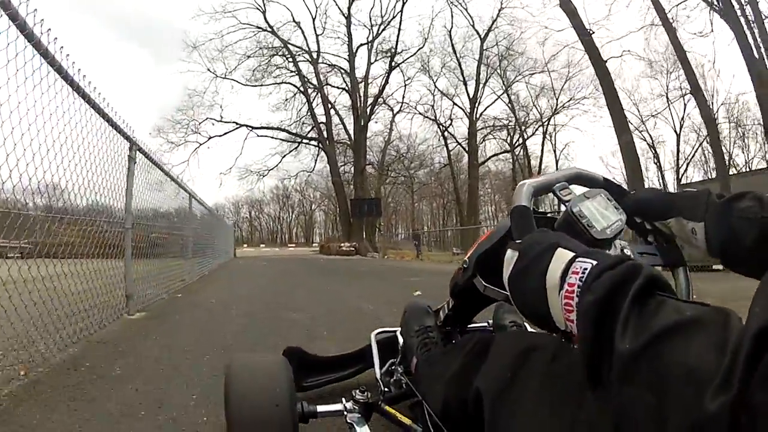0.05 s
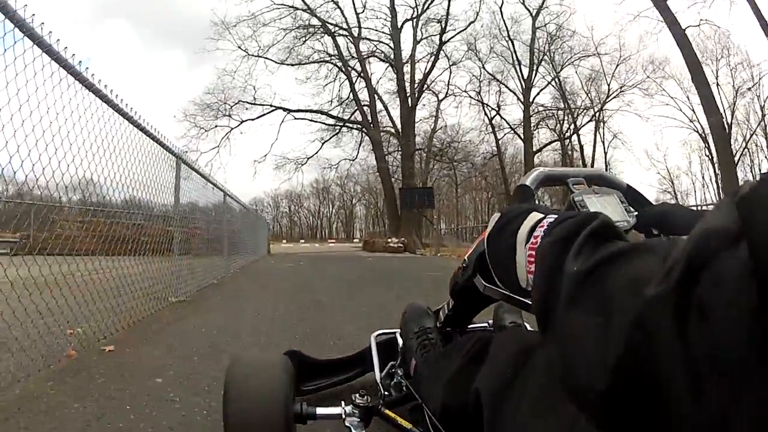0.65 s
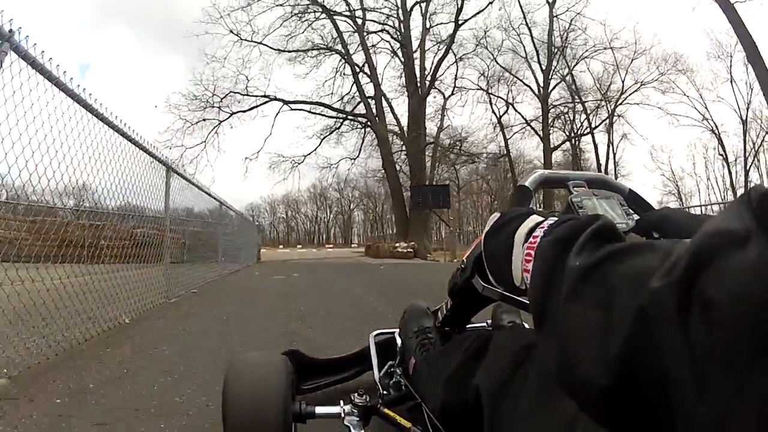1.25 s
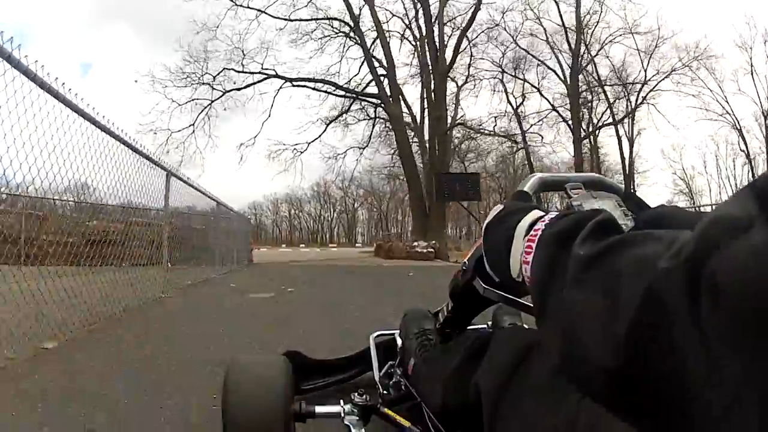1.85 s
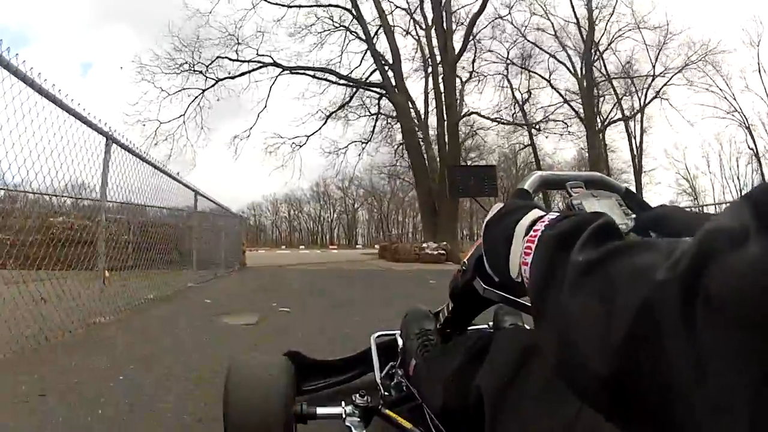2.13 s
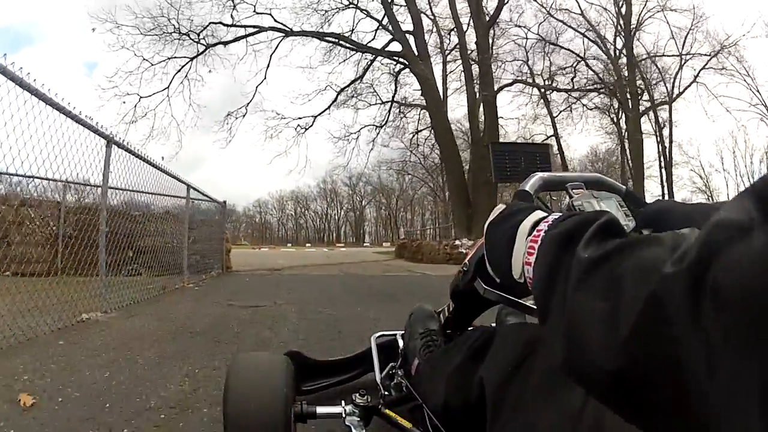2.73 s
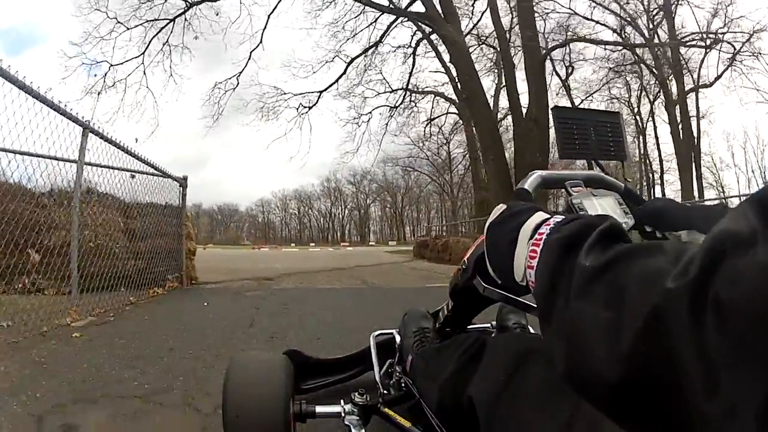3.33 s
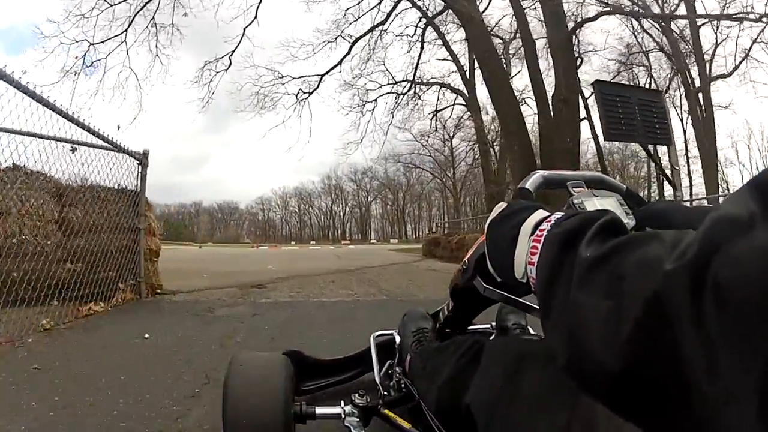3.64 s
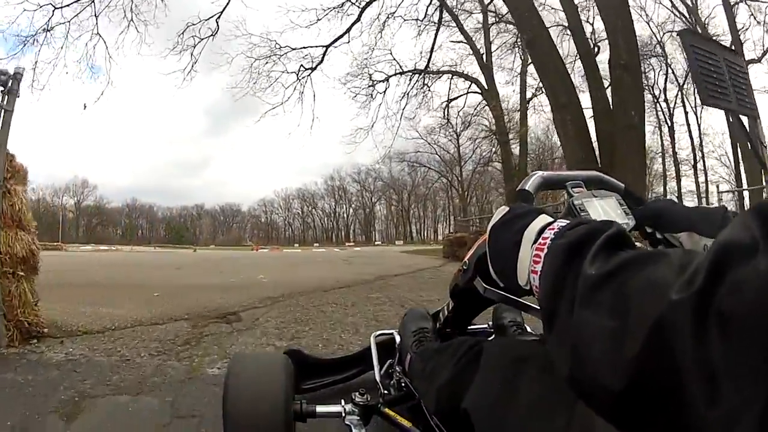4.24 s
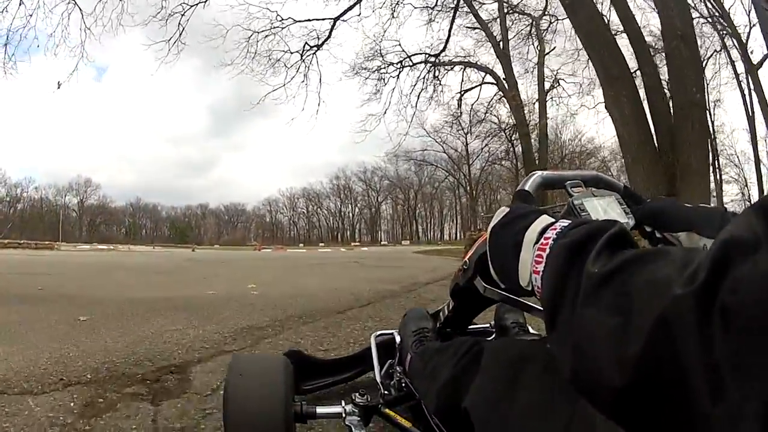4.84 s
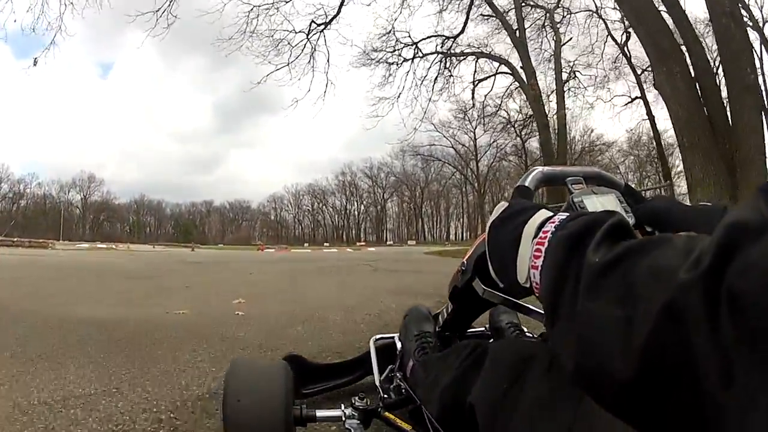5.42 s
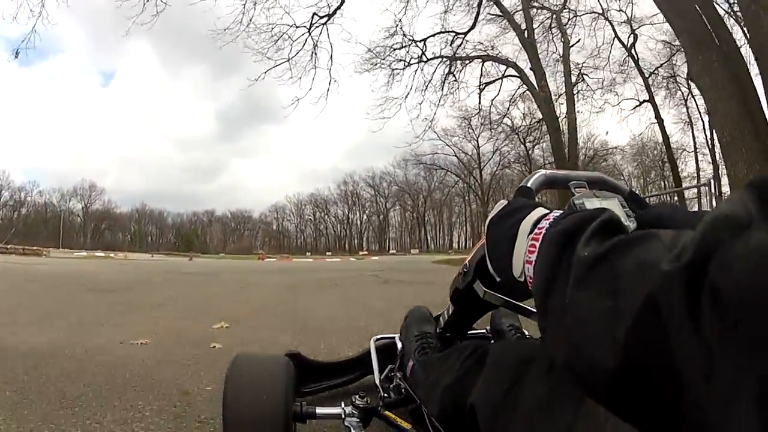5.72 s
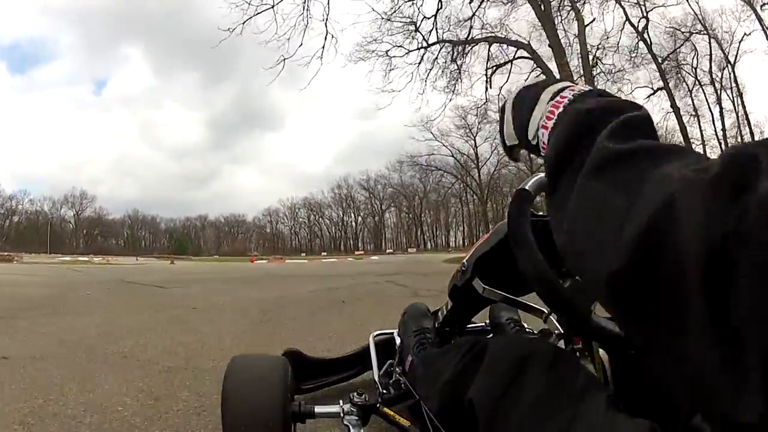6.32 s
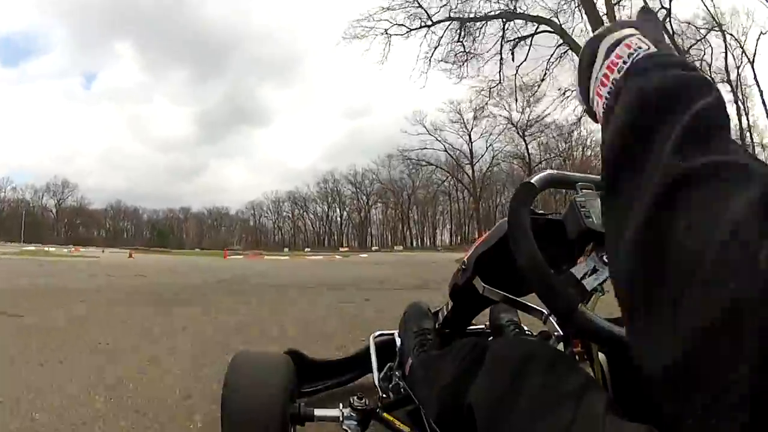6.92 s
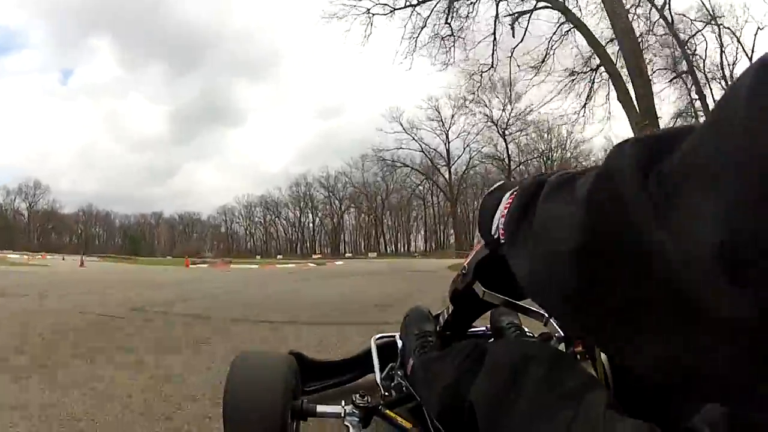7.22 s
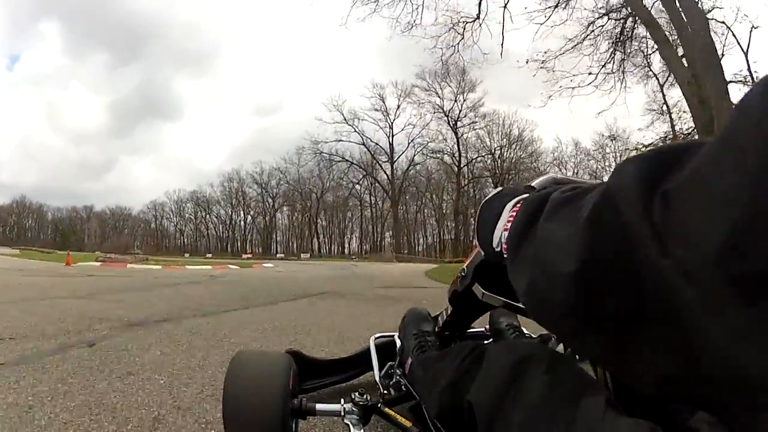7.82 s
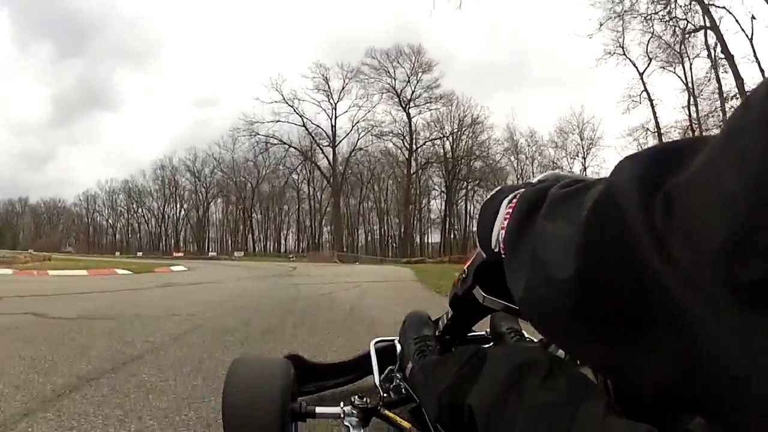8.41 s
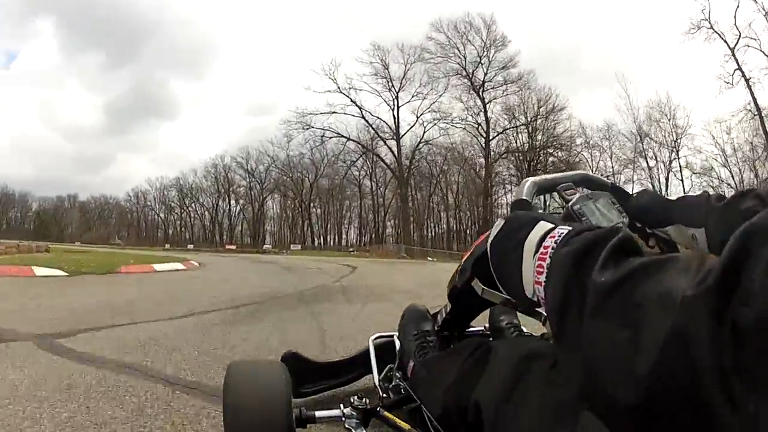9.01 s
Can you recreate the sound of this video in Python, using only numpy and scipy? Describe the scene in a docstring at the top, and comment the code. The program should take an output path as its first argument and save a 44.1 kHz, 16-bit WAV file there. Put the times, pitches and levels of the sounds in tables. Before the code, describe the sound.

Heard up close from the frame of a go-kart rolling onto an outdoor track, a two-stroke engine sputters and pops. As it slows, loud scattered exhaust cracks break through surges of tyre rumble and rattling from the rough surface. A little past halfway the engine catches and climbs steadily in pitch, firing ever more rapidly, while the housing around the microphone buzzes and knocks.

```python
"""Uneven pops of an idling two-stroke kart engine, about one every third turn, heard from its frame.
The kart rolls out, coasts with hard bangs over broken asphalt, then picks up and fires ever more often.
Each firing is an impulse that excites the resonances of pipe, engine metal and frame and leaves a puff
of turbulent gas. The piston sways the frame, the tyres rumble, and the housing around the microphone
rattles and knocks. A limiter ducks the level after every hard bang."""
import sys
import numpy as np
from scipy import signal
from scipy.fft import rfft, irfft
from scipy.io import wavfile
from scipy.ndimage import uniform_filter1d

SR = 44100
rng = np.random.default_rng(int(sys.argv[2]) if len(sys.argv) > 2 else 0)


def store_pcm(level_fs):
    """Save levels as 16-bit WAV."""
    pcm = np.round(np.clip(level_fs, -1, 1) * 32767).astype(np.int16)
    wavfile.write(sys.argv[1], SR, np.atleast_2d(pcm).T)


N = 403956
TIME = np.arange(N) / SR
RING_TIME = np.arange(8192) / SR  # time axis of the impulse responses

# Levels in all tables are relative.
# Rotation rate of the crank: t/s, f/Hz
CRANK_SPEED = [(0, 47.96), (1.95, 47.96), (2.2, 45), (2.9, 33.69), (4.3, 32), (4.48, 48), (4.8, 32),
               (5.2, 33), (5.2375, 44.7), (5.32, 54.42), (5.47, 59.59), (6.1, 60.53), (7.05, 63.23),
               (7.35, 68.36), (8.0, 81.5), (9.16, 105.65)]
# Turns needed to gather a charge that burns: start t/s, interval/turns (0 = coasting)
FIRING_RHYTHM = [(.015, 3), (.14, 4), (.31, 2), (.44, 3), (.68, 5), (.79, 3.5), (1.08, 3), (1.39, 4),
                 (1.64, 3), (2.0, 4), (2.22, 0), (5.23, 2), (7.18, 1.72), (7.36, 1.125), (7.49, 1.065),
                 (7.76, 1.095), (7.91, 1.3), (7.96, 1.5), (8.13, 1.5), (8.56, 1.53)]
# Stray bangs while coasting: t/s, level/dB
STRAY_BANGS = [(2.2453, -1.5), (2.61, -1), (2.7239, 14), (2.9184, 11.5), (3.0373, 10.5), (3.0791, 11),
               (3.115, 10), (3.3772, -6.5), (3.4931, 4), (3.5843, 5.5), (3.711, 10.5), (3.8688, -3),
               (3.8975, 10.5), (3.9898, -6.5), (4.0982, 7.5), (4.2655, -4), (4.3307, 10.5), (4.4151, 10.5),
               (4.4568, 11.5), (4.5163, 10.5), (4.7456, 1.5), (4.809, -2), (4.8407, 5), (4.9346, 9),
               (5.0887, 11)]
# Exhaust pipe resonances: f/Hz at idle, f/Hz at speed, bandwidth/Hz, level/dB
PIPE_RESONANCES = [(679, 630, 210, 4.5), (1077, 1030, 230, -14), (1800, 1805, 134, -0.5),
                   (2296, 2445, 84, 4.5), (2582, 2700, 143, -0.5), (3426, 3590, 226, 7),
                   (3540, 3720, 90, 4.5), (4492, 4740, 111, 5), (4937, 5050, 237, -2.5),
                   (5175, 8300, 144, -8), (6650, 6550, 65, -7), (7070, 7070, 340, -6.5),
                   (7485, 7280, 104, 0.5), (8595, 8300, 157, 1), (10070, 18000, 270, -10),
                   (9060, 6900, 170, -55), (14340, 42000, 280, -7.5)]
# Spectrum of the turbulent gas: f/Hz, level/dB
GAS_SPECTRUM = [(500, -35), (1100, -0.5), (1550, -4), (1850, 6.5), (2700, 1), (3500, 7), (4100, -13),
                (4800, 5), (6000, -14.5), (7200, -7.5), (8700, 0), (10800, -9.5), (13300, -4.5),
                (15000, -46)]
# Modes of the engine's metal: f/Hz, level/dB, T60/s
METAL_MODES = [(1850, -17, .1), (2963, 3, .12), (4690, -15, .13), (5087, -24, .2), (6925, -21, .2),
               (7321, -19, .16), (9035, -7, .11), (14968, -9, .11)]
# Low modes of frame and air box: f/Hz, level/dB, T60/s
FRAME_MODES = [(83, -7.5, 0.33), (145.3, -9.5, 0.097), (220, -1, 0.2), (275.2, -0.5, 0.18),
               (395, -9, 0.057), (433, -20, 0.053), (570, -1.5, 0.11), (745, -20.5, 0.14)]
# Sway of the frame against crank rate: f/Hz, level/dB
FRAME_SWAY = [(32, -22.5), (48, -28), (55, -17), (60, -26), (68, -27.5), (76, -22.5), (88, -23.5),
              (98, -30.5)]
# Cavity resonances of the air box: f/Hz, bandwidth/Hz, level/dB
AIRBOX_RESONANCES = [(98, 30, -5), (165, 80, 3), (425, 60, -5)]
# Spectrum of the tyre rumble: f/Hz, level/dB
TYRE_SPECTRUM = [(20, -36), (50, -7), (90, -4.5), (170, -5.5), (250, -6), (400, -11.5), (750, -44),
                 (1000, -24.5), (3000, -60), (6000, -52), (9000, -40.5)]
# Stretches of broken asphalt: start t/s, end t/s, rumble level/dB, rattle level/dB
BROKEN_ASPHALT = [(2.23, 2.556, -14.5, -14), (2.562, 3.094, -8, -9), (3.273, 3.682, -10, -11),
                  (3.72, 3.864, -10.5, -12), (4.007, 4.46, -12, -21.5), (4.576, 4.93, -9.5, -18),
                  (4.924, 5.2, -11.5, -17)]
# Hard knocks of the housing: t/s, level/dB
HARD_KNOCKS = [(1.496, 1.5), (1.581, 0), (2.71, 2), (3.01, 0), (3.115, 14), (3.44, -2), (5.439, 1),
               (5.539, 4), (6.053, 3.5), (6.818, -1), (6.937, 2), (7.125, -0.5), (7.273, 6.5), (7.341, 6.5),
               (7.87, 4.5), (8.028, 3), (8.208, 4), (8.627, 0)]
# Spectrum of the housing's rattle: f/Hz, level/dB
RATTLE_SPECTRUM = [(40, -12), (150, -5), (350, -2), (500, 0), (670, 5), (770, 0.5), (860, -10), (980, -18),
                   (1250, -19.5), (1550, -21), (3000, -20.5), (6000, -39)]
# High resonances of the housing: f/Hz, bandwidth/Hz, level/dB
SIZZLE_RESONANCES = [(11330, 230, 0), (12670, 230, 0), (14950, 300, -5)]
# Response of the microphone in its housing: f/Hz, level/dB
MICROPHONE_RESPONSE = [(0, -0.5), (9500, 0), (10700, -7.5), (13400, -7.5), (14500, -3), (16000, -14)]

THROTTLE_S = 5.2375  # the throttle opens
IDLE_DB, OPEN_DB, AT_SPEED_DB = 2.5, -1.5, -4.5  # firing level: idle, open throttle, change at speed
FLOODED_DB, CLEARING_S = 9, 0.29  # fuel gathered while coasting makes the first firings harder
AFTER_MISS_DB, STEADY_DB = 1.6, 3  # firings are stronger after a missed turn and in an unbroken run


def crank():
    """Angle is the integral of rotation rate: returns it in turns, and the time of each whole turn."""
    turns = np.cumsum(curve(CRANK_SPEED, TIME)) / SR
    turns -= np.interp(THROTTLE_S, TIME, turns)
    return turns, np.interp(np.arange(np.ceil(turns[0]), turns[-1]), turns, TIME)


def firings(turn_s, uneven_db=1.0, jitter_s=.0003):
    """Combustion is a pulse train locked to the crank: returns times and sizes, stray bangs included."""
    ends = [start for start, _ in FIRING_RHYTHM[1:]] + [TIME[-1]]
    fired = []
    for (start, every), end in zip(FIRING_RHYTHM, ends):
        if every:
            first, last = np.searchsorted(turn_s, [start, end])
            fired.extend(first + np.arange(0, last - first, every).astype(int))
    t = turn_s[fired]
    after_miss = np.diff(fired, prepend=0) > 1
    flooded = np.exp(-abs(t - THROTTLE_S) / CLEARING_S)
    open_db = OPEN_DB + AT_SPEED_DB * workload(t) + FLOODED_DB * flooded
    open_db += AFTER_MISS_DB * after_miss + STEADY_DB * steadiness(t)
    bang_s, bang_db = np.transpose(STRAY_BANGS)
    strength, lateness = rng.standard_normal((len(t), 2)).T
    db = np.where(t < bang_s[0], IDLE_DB, open_db) + uneven_db * (1 - steadiness(t)) * strength
    jittered_s = t + jitter_s * (1 - workload(t)) * lateness
    return np.r_[jittered_s, bang_s], gain_of(np.r_[db, bang_db])


def half_burns(turn_s, share=.08, half_db=-12):
    """Partial combustion on a few idling turns gives faint ticks among the pops."""
    t = turn_s[(rng.random(len(turn_s)) < share) & (turn_s < STRAY_BANGS[0][0])]
    return t, np.full(len(t), gain_of(half_db))


def exhaust(t, size, crack_db=-1.0, drift=0.0077, softening_db=-2.0, unsteady=.08):
    """Impulse excitation: each firing rings the pipe, whose resonances shift and soften with load."""
    loads = np.linspace(0, 1, 9)
    firing_load = workload(t) + unsteady * (1 - steadiness(t)) * rng.standard_normal(len(t))
    nearest = abs(firing_load[:, None] - loads).argmin(1)
    cracks = []
    for load in loads:
        pipe = [((idle + load * (fast - idle)) * (1 + drift * rng.standard_normal()), width, db)
                for idle, fast, width, db in PIPE_RESONANCES]
        cracks.append(resonances(pipe))
    mean_peak = np.abs(cracks).max(1).mean()
    cracks = np.array(cracks) / mean_peak * gain_of(crack_db + softening_db * loads)[:, None]
    return sum(ring(impulses(t, size * (nearest == k)), crack) for k, crack in enumerate(cracks))


def gas(t, size, echo_db=-23, echo_t60=.06, puff_db=-21, puff_t60=0.094, tail_db=-35, tail_t60=0.2,
        hiss_db=-40, rasp_db=3, calm_db=-9):
    """Scattering off the kart gives every firing the same echo; turbulence adds a fresh puff over hiss."""
    fired = impulses(t, size * gain_of(rasp_db * workload(t) ** 2))
    scatter = colour(rng.standard_normal(N), GAS_SPECTRUM)[:len(RING_TIME)] * decay(echo_db, echo_t60)
    puff_power = decay(puff_db, puff_t60) ** 2 + decay(tail_db, tail_t60) ** 2
    puffs = fired * gain_of(calm_db * steadiness(TIME))
    power = abs(ring(puffs ** 2, puff_power)) + gain_of(hiss_db) ** 2  # incoherent sounds add in power
    return ring(fired, scatter) + np.sqrt(power) * colour(rng.standard_normal(N), GAS_SPECTRUM)


def engine_body(t, size, metal_db=-21, thump_db=-21, hardest_db=3, metal_fade_db=-6, thump_fade_db=-4):
    """Free vibration: firings strike the modes of engine metal and frame, more gently at speed."""
    fade = workload(t) ** 2
    strikes = impulses(t, size * gain_of(metal_db + metal_fade_db * fade))
    thumps = impulses(t, np.minimum(size, gain_of(hardest_db)) * gain_of(thump_db + thump_fade_db * fade))
    return ring(strikes, modes(METAL_MODES)) + ring(thumps, modes(FRAME_MODES))


def frame_sway(turns):
    """Forced vibration: the piston sways the frame once a turn, fired or not."""
    sway_db = curve(FRAME_SWAY, curve(CRANK_SPEED, TIME))
    return np.sqrt(2) * np.sin(2 * np.pi * turns) * gain_of(sway_db)


def air_box(turn_s, pump_db=-1):
    """Cavity resonance: the piston pumps a hollow note from the air box on every turn."""
    gulps = impulses(turn_s, 1 + .2 * rng.standard_normal(len(turn_s)))
    return gain_of(pump_db) * unit_rms(ring(gulps, resonances(AIRBOX_RESONANCES)))


def tyres(turns, road_db=-4, throb=0.29):
    """Rolling noise: a low rumble, amplitude-modulated at the crank rate."""
    noise = rng.standard_normal(N) * (1 + throb * np.sin(2 * np.pi * turns))
    return gain_of(road_db) * colour(noise, TYRE_SPECTRUM)


def shaking(pit_lane_db=-23.5, track_db=-37, engine_db=-17, at_speed_db=2.5, attack_s=0.14, release_s=0.19):
    """Powers add: gains of rumble and rattle, each a base that swells on broken asphalt."""
    rumble_power = gain_of(np.where(TIME < THROTTLE_S, pit_lane_db, track_db)) ** 2
    rattle_power = gain_of(engine_db + at_speed_db * workload(TIME)) ** 2
    for start, end, rumble_db, rattle_db in BROKEN_ASPHALT:
        envelope = np.clip((TIME - start) / attack_s, 0, 1) * np.exp(-np.maximum(TIME - end, 0) / release_s)
        rumble_power += (envelope * gain_of(rumble_db)) ** 2
        rattle_power += (envelope * gain_of(rattle_db)) ** 2
    return np.sqrt(rumble_power), np.sqrt(rattle_power)


def housing_knocks(fired_s, hz=670, length_s=0.0084, hard_db=-2, lead_s=0.0022,
                   share=.16, light_db=-10.0, spread_db=-2.5, within_s=.02):
    """Impacts on the housing give short tone bursts: some hard, and light ones just after a few firings."""
    t, db = np.transpose(HARD_KNOCKS)
    chance, delay, strength = rng.random((len(fired_s), 3)).T
    light_size = (chance < share) * gain_of(light_db + spread_db * (2 * strength + 0.5))
    blows = impulses(t - lead_s, gain_of(db + hard_db)) + impulses(fired_s + within_s * delay, light_size)
    window = np.sin(np.pi * np.minimum(RING_TIME / length_s, 1)) ** 2
    return ring(blows, window * np.sin(2 * np.pi * hz * RING_TIME)) + housing_wall(blows)


def housing_wall(blows, hz=1820, t60=0.087, wall_db=-17, idle_db=-9):
    """A knocked wall rings in one damped mode, most strongly at speed."""
    return ring(blows * gain_of(idle_db * (1 - workload(TIME))), modes([(hz, wall_db, t60)]))


def housing_rattle(fired, taps_per_s=200, spread_db=2.5, buzz_db=-4, tap_db=-5, sizzle_db=-14,
                   throb=0.42, lag_s=0.0073):
    """Random excitation: dull taps, buzz and a thin sizzle, strongest just after each firing."""
    jolt = abs(ring(np.minimum(fired, 1), RING_TIME / lag_s * np.exp(1 - RING_TIME / lag_s)))
    chatter = 1 + throb * jolt
    chatter /= uniform_filter1d(chatter, size=SR // 4)  # holds the mean level steady
    sizes = gain_of(spread_db * np.minimum(rng.exponential(1, N), 4)) * rng.choice([-1, 1], N)
    taps = unit_rms(sizes * (rng.random(N) < taps_per_s / SR))
    drive = chatter * (gain_of(tap_db) * taps + gain_of(buzz_db) * rng.standard_normal(N))
    sizzle = unit_rms(ring(drive, resonances(SIZZLE_RESONANCES)))
    return colour(drive, RATTLE_SPECTRUM) + gain_of(sizzle_db) * sizzle


def workload(t, idle_hz=47, fast_hz=78):
    """Load follows the crank rate: 0 at idle, 1 at speed."""
    return np.clip((curve(CRANK_SPEED, t) - idle_hz) / (fast_hz - idle_hz), 0, 1)


def steadiness(t):
    """Regularity of the pulse train: 1 when every turn fires, 0 when the engine sputters."""
    start, intervals = np.transpose(FIRING_RHYTHM)
    every = intervals[np.searchsorted(start, t, "right") - 1]
    return (every > 0) * np.clip(1 - 2 * (every - 1), 0, 1)


def resonances(table):
    """Impulse response of double-pole resonators: tones that build up and die away."""
    response = 0
    for hz, width, db in table:
        age = np.pi * width * RING_TIME / np.sqrt(np.sqrt(2) - 1)  # in time constants
        response += gain_of(db) * width * age * np.exp(-age) * np.sin(2 * np.pi * hz * RING_TIME)
    return response


def modes(table):
    """Modal superposition: a struck body sounds as a sum of damped sines."""
    return sum(decay(db, t60) * np.sin(2 * np.pi * hz * RING_TIME) for hz, db, t60 in table)


def decay(db, t60):
    """Exponential damping: the level falls 60 dB in t60 seconds."""
    return gain_of(db - 60 * RING_TIME / t60)


def impulses(t, size):
    """An impulse train with the given times and sizes."""
    return np.bincount(np.clip(np.round(t * SR).astype(int), 0, N), size, N + 1)[:N]


def ring(x, response):
    """Convolution: every impulse in x sets off the response."""
    return signal.oaconvolve(x, response)[:N]


def colour(x, spectrum):
    """Spectral shaping of a flat sound, returned at rms 1."""
    hz, db = np.transpose(spectrum)
    shape_db = np.interp(np.log(np.fft.rfftfreq(N, 1 / SR) + 1), np.log(hz), db)
    return unit_rms(irfft(rfft(x) * gain_of(shape_db), N))


def curve(rows, at):
    """Linear interpolation in a two-column table."""
    return np.interp(at, *np.transpose(rows))


def unit_rms(x):
    """Normalisation to rms 1."""
    return x / np.sqrt(np.mean(x ** 2) + 1e-20)


def gain_of(db):
    """Amplitude ratio of a level in decibels."""
    return 10 ** (np.asarray(db) / 20)


def scene():
    """Superposition of engine, chassis and housing at one close microphone."""
    turns, turn_s = crank()
    t, size = np.hstack([firings(turn_s), half_burns(turn_s)])
    rumble_gain, rattle_gain = shaking()
    engine = exhaust(t, size) + gas(t, size) + engine_body(t, size)
    chassis = frame_sway(turns) + rumble_gain * (air_box(turn_s) + tyres(turns))
    housing = rattle_gain * housing_rattle(impulses(t, size)) + housing_knocks(t)
    return (engine + chassis + housing)[None]


def record(dry, low_cut_hz=40, limit_db=-1.0, recovery_db_per_s=52, attack_s=0.0038, delay_s=0.0015,
           high_cut_hz=15500):
    """Limiting and filtering: the gain drops late and recovers slowly, so the fronts of bangs saturate."""
    dry = signal.sosfilt(signal.butter(3, low_cut_hz, "high", fs=SR, output="sos"), dry)
    over_db = np.maximum(20 * np.log10(abs(dry[0]) + 1e-9) - limit_db, 0)
    recovery_db = TIME * recovery_db_per_s
    held_db = np.maximum.accumulate(over_db + recovery_db) - recovery_db
    late_db = np.interp(TIME - delay_s, TIME, held_db)
    pole = np.exp(-1 / (attack_s * SR))
    ducked = dry / gain_of(signal.lfilter([1 - pole], [1, -pole], late_db))
    saturated = .95 * ducked / (1 + ducked ** 4) ** (1 / 4)
    microphone = gain_of(curve(MICROPHONE_RESPONSE, np.fft.rfftfreq(N, 1 / SR)))
    coloured = irfft(rfft(saturated) * microphone, N)
    low_pass = signal.firwin(255, high_cut_hz, window=("kaiser", 9), fs=SR)
    return signal.oaconvolve(coloured, low_pass[None], "same")


dry = scene()
out = record(dry)
store_pcm(out)
```